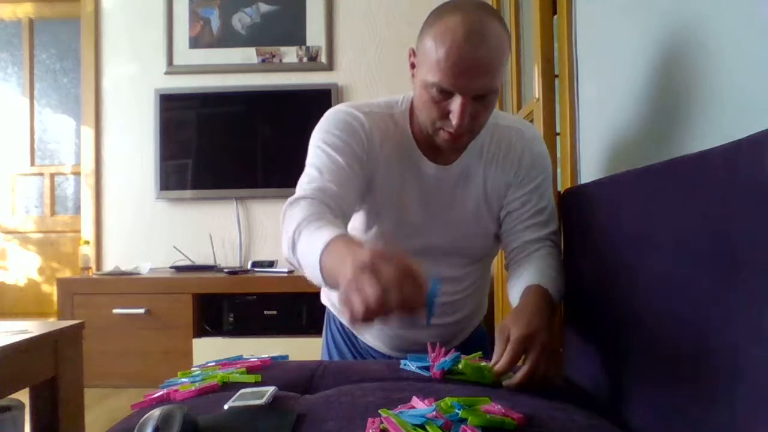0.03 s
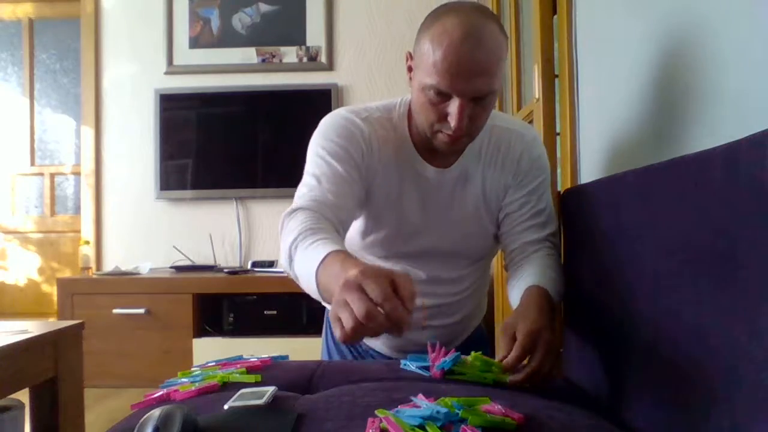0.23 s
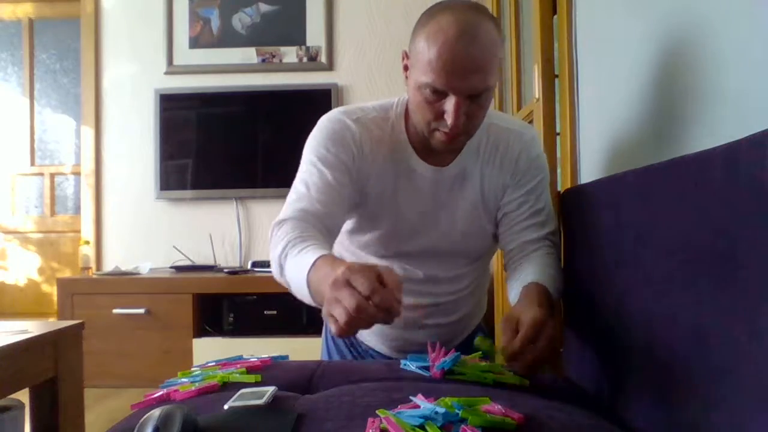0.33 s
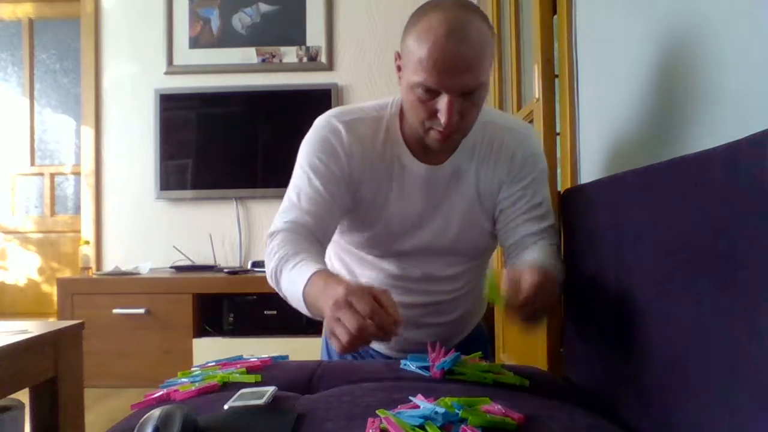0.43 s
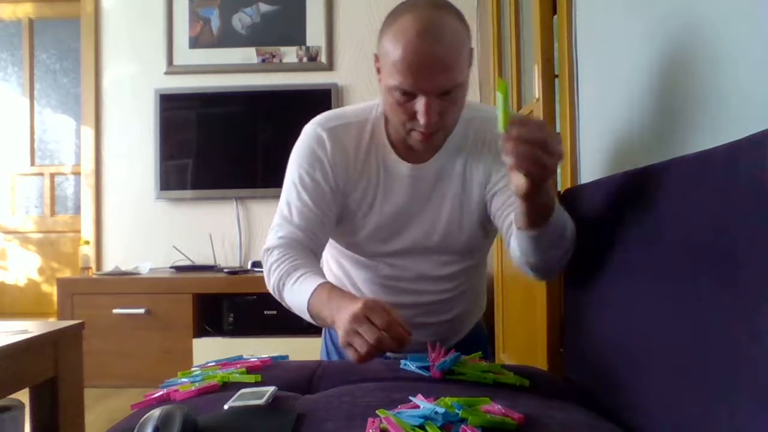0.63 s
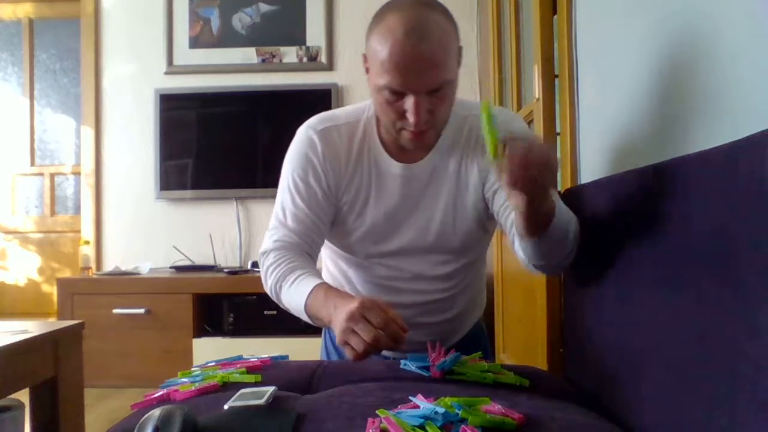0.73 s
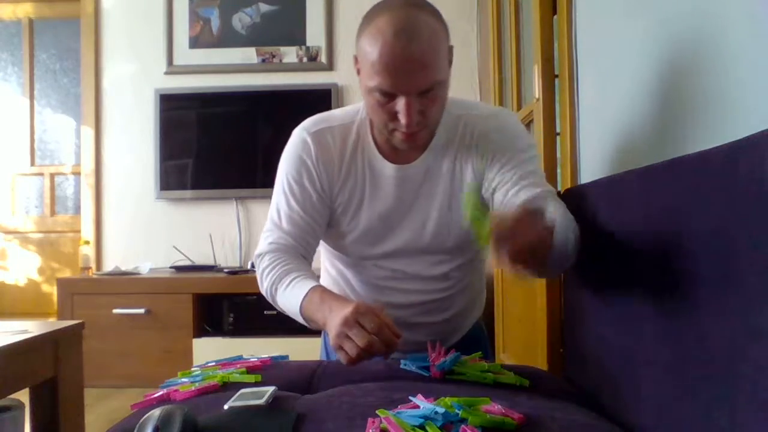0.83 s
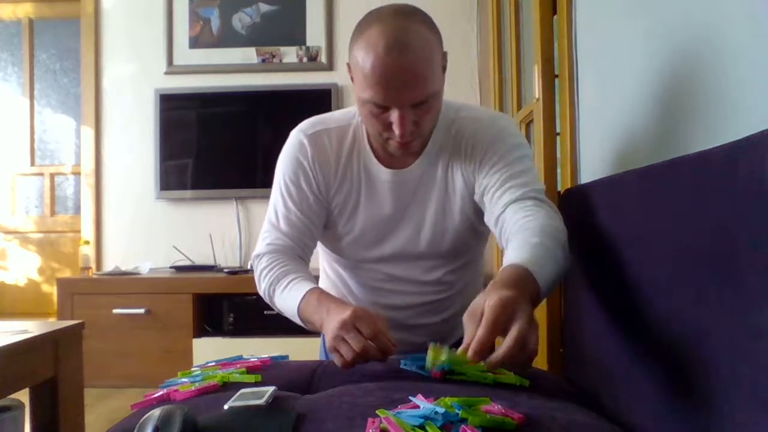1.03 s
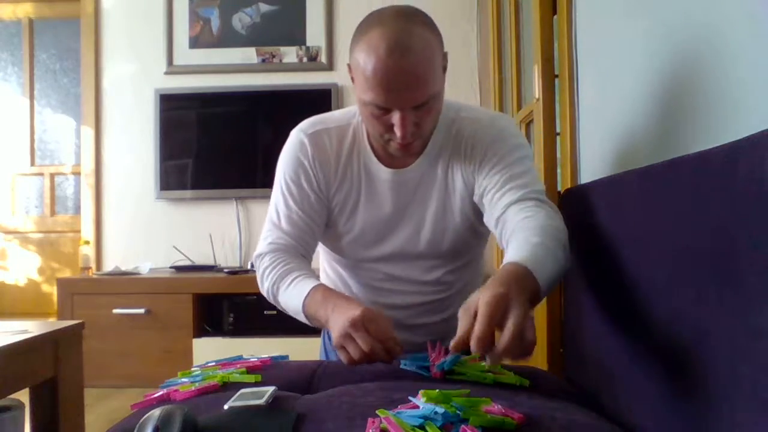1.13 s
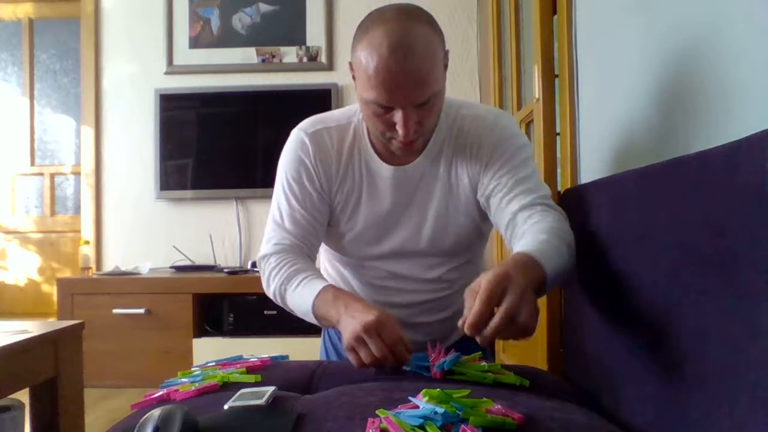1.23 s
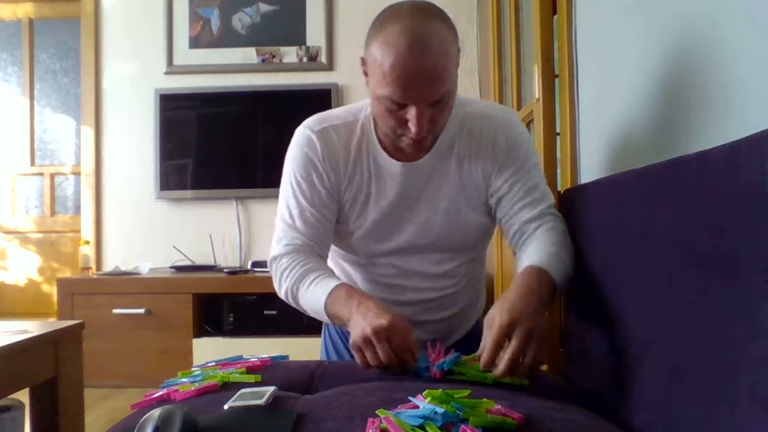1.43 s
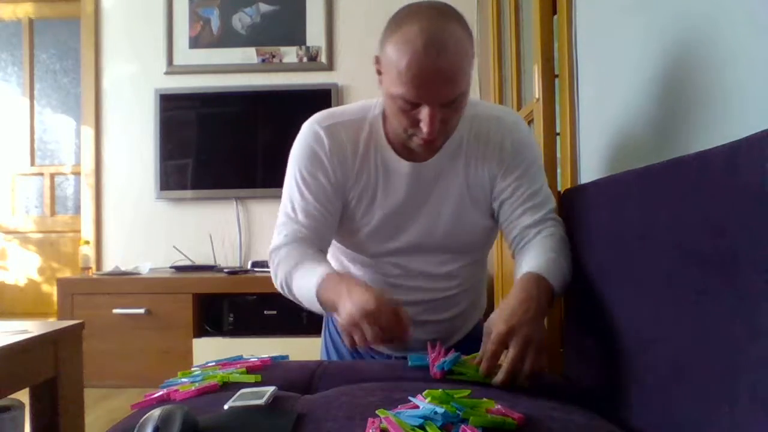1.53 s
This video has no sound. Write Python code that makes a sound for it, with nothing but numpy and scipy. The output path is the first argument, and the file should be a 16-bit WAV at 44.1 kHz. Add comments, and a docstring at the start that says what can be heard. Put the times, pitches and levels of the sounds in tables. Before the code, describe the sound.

Plastic clothespins clip together on a sofa cushion in a small living room. A faint creak at 0.18 s leads to a sharp, rattling snap at 0.25 s with dull thuds. A light tick comes near 0.67 s, then soft rustles and a fainter tick at 0.93 s. A thin squeak at 1.06 s precedes a softer snap around 1.18 s; cloth rustles near 1.55 s. Low pulsing electrical buzz and faint hiss continue throughout.

```python
"""Clothespins on a sofa cushion

Plastic clothespins clip together in a small living room. One creaks and another squeaks as it is squeezed;
each then snaps in a cluster of clicks (noise crack, jaw ring, body modes) over cushion thuds (damped sines).
Faint ticks come between the snaps; rustles come between and after (both resonant noise). A low electrical
buzz (regular pulses, each with a damped swing) runs throughout, over faint hiss and rumble (coloured noise)."""
import sys
import numpy as np
from scipy import signal
from scipy.fft import rfft, irfft, next_fast_len
from scipy.io import wavfile
from scipy.ndimage import map_coordinates

SR = 44100
rng = np.random.default_rng(int(sys.argv[2]) if len(sys.argv) > 2 else 0)


def log_audio(samples):
    """Write samples as a 16-bit WAV file to the path given in sys.argv[1]."""
    # one column per channel
    frames = np.atleast_2d(samples).T
    # limit to full scale, then quantise
    limited = np.clip(frames, -1, 1)
    pcm = np.round(limited * 32767).astype(np.int16)
    wavfile.write(sys.argv[1], SR, pcm)


N = 70560
TIME = np.arange(N) / SR
AGE = TIME[:SR // 2]  # s since an onset


def amp(db):
    """Amplitude gain from dB."""
    return 10 ** (np.asarray(db) / 20)


def unit(x):
    """Scale to rms 1."""
    return x / np.sqrt(np.mean(x ** 2) + 1e-20)


def along(points, hz):
    """Interpolate (f/Hz, value) points on a log-frequency axis."""
    f, v = np.transpose(points)
    return np.interp(np.log(hz + 1), np.log(f + 1), v)


def filtered(x, response):
    """Multiply the spectrum of x by a response of frequency; zero padding limits wrap-around."""
    m = next_fast_len(len(x) + 8192)
    hz = np.fft.rfftfreq(m, 1 / SR)
    return irfft(rfft(x, m) * response(hz), m)[:len(x)]


def low_cut(x, hz):
    """First-order high-pass."""
    return filtered(x, lambda f: 1j * f / (hz + 1j * f))


def high_cut(x, hz, order):
    """Zero-phase low-pass with Butterworth magnitude."""
    return filtered(x, lambda f: 1 / np.sqrt(1 + (f / hz) ** (2 * order)))


def noise(spectrum):
    """Noise coloured by (f/Hz, level/dB) points, rms 1."""
    return unit(filtered(rng.standard_normal(N), lambda f: amp(along(spectrum, f))))


def band(hz, width_hz):
    """Noise through one resonance, rms 1."""
    return unit(filtered(rng.standard_normal(N), lambda f: 1 / (1 + (2 * (f - hz) / width_hz) ** 2)))


def fade(t60_s, t=AGE):
    """Exponential decay, -60 dB at t60."""
    return np.exp(-np.log(1000) * t / t60_s)


def ring(hz, t60_s):
    """Damped sine mode."""
    return np.sin(2 * np.pi * hz * AGE) * fade(t60_s)


def strike(modes):
    """Sum of an object's modes; level, sign and pitch vary at each blow."""
    out = np.zeros(len(AGE))
    for hz, db, t60_s in modes:
        gain = amp(db + rng.normal(0, 0.97)) * rng.choice([-1, 1])
        out += gain * ring(hz * (1 + rng.normal(0, 0.0034)), t60_s)
    return out


def add(track, s, sound):
    """Mix a sound into a track at time s."""
    part = track[max(round(s * SR), 0):][:len(sound)]
    part += sound[:len(part)]


# room decay: f/Hz, t60/s
ROOM_DECAY = [(100, 0.16), (300, 0.54), (1000, 0.4), (2500, 0.34), (5000, 0.37), (7500, .37)]
# diffuse tail spectrum: f/Hz, level/dB
TAIL_COLOUR = [(100, 5), (300, -10), (700, -2.5), (1300, 5), (2200, 3), (3500, 3.5), (5500, 0),
               (7300, -2.5)]
TAIL_BUILD_S, EARLY_DB, EARLY_T60_S, EARLY_GAP_S = 0.022, -6.5, 0.12, 0.002


def in_room(x, wet_db):
    """Direct sound, early echoes off near furniture, diffuse tail with frequency-dependent decay."""
    hz, t, z = signal.stft(rng.standard_normal(len(AGE)), SR, nperseg=256)
    z = z * fade(along(ROOM_DECAY, hz)[:, None], t)
    z = z * amp(along(TAIL_COLOUR, hz))[:, None]
    tail = signal.istft(z, SR, nperseg=256)[1][:len(AGE)]
    tail = tail * (1 - np.exp(-AGE / TAIL_BUILD_S))
    sparse = rng.standard_normal(len(AGE)) ** 5  # few samples dominate
    early = sparse * fade(EARLY_T60_S) * (AGE > EARLY_GAP_S)
    answer = amp(wet_db) * tail / np.linalg.norm(tail) + amp(EARLY_DB) * early / np.linalg.norm(early)
    return x + signal.fftconvolve(x, answer)[:len(x)]


# jaw contacts, per pin: t/s, level/dB, jaw ring f/Hz, jaw ring level/dB, body level/dB
JAW_CONTACTS = {"blue": [(.2348, -17, 7074, 3.5, -3), (.2452, -19.5, 6230, 6.5, 0.5),
                (.2474, -26, 5060, -10, -12), (.2525, -21, 6800, -5, -21), (.2564, -16.5, 6940, 6.5, -3),
                (.258, -23, 5500, 6.5, -5)], "green": [(1.1631, -21, 5730, 6.5, -3.5),
                (1.1742, -31, 5090, 3.5, -0.5), (1.1784, -18, 6660, 4.5, -5.5),
                (1.1853, -24, 6120, -2.5, 0), (1.1905, -27.5, 4760, -1, 2)]}
# pin body modes, per pin: f/Hz, level/dB, t60/s
PIN_MODES = {"blue": [(945, -22.5, 0.012), (1137, -17, 0.016), (1630, -20, .012), (2446, -15, .018),
             (2792, -16, 0.018), (3383, -12.5, 0.023), (3765, -12, 0.02), (4446, -7, 0.011),
             (5820, -9.5, 0.017), (6800, -21.5, 0.022), (6930, -7.5, 0.022)], "green": [(1150, -21, .025),
             (1304, -19, .025), (1798, -18, 0.014), (2284, -16.5, 0.019), (3353, -16, 0.017),
             (3563, -14, 0.013), (4290, -9, 0.0082), (5180, -12.5, 0.0075), (5700, -9, 0.0069),
             (6640, -9, .02), (7200, -1.5, 0.012)]}
# crack noise spectrum: f/Hz, level/dB
CRACK_SPECTRUM = [(300, -27), (750, -32.5), (1200, -21), (2000, -18), (3000, -7.5), (5000, 1.5),
                  (7200, -4.5), (9000, -10.5)]
# room tail level of each pin's snap, per pin: relative level/dB
PIN_TAIL_DB = {"blue": -0.5, "green": 0}
JAW_T60_S, ATTACK_S, CRACK_T60_S, CRACK_DB = 0.0078, 0.00058, 0.0099, 0.5
SNAP_WET_DB = -6.5
ECHO_S, ECHO_DB = 0.0032, -14.5  # nearest hard surface


def snaps():
    """Each contact excites a noise crack, a bright jaw ring and the modes of the pin's body."""
    out = np.zeros(N)
    onset = 1 - np.exp(-(AGE / ATTACK_S) ** 2)
    crack_shape = onset * fade(CRACK_T60_S)
    crack_rms = np.sqrt(np.mean(crack_shape ** 2))
    for pin, contacts in JAW_CONTACTS.items():
        for s, db, jaw_hz, jaw_db, body_db in contacts:
            crack = unit(noise(CRACK_SPECTRUM)[:len(AGE)] * crack_shape) * crack_rms
            jaw = amp(jaw_db) * ring(jaw_hz, JAW_T60_S)
            body = amp(body_db) * strike(PIN_MODES[pin])
            click = amp(db) * (amp(CRACK_DB) * crack + onset * (jaw + body))
            add(out, s, in_room(click, SNAP_WET_DB + PIN_TAIL_DB[pin]))
            add(out, s + ECHO_S, amp(ECHO_DB) * click)
    return out


# hands pressing pins into the cushion: t/s, level/dB, f/Hz, t60/s
CUSHION_PUSHES = [(0.2342, -43.5, 91.8, 0.083), (0.2466, -27, 350, 0.023), (0.2535, -35, 86, .13),
                  (0.257, -30.5, 375, .022), (.268, -31, 220, 0.01), (0.302, -42, 190, 0.018),
                  (1.168, -43, 325, 0.029), (1.181, -33, 324, 0.016), (1.1949, -37, 266.3, .035),
                  (1.2035, -44, 140, .06)]
THUD_LOW_CUT_HZ, THUD_HIGH_CUT_HZ = 30, 525  # the cushion passes little above


def thuds():
    """Soft cushion pushes: damped low sines, band-limited by the padding."""
    out = np.zeros(N)
    for s, db, hz, t60_s in CUSHION_PUSHES:
        add(out, s, -amp(db) * ring(hz, t60_s))
    soft = high_cut(out, THUD_HIGH_CUT_HZ, order=5)
    return in_room(low_cut(soft, THUD_LOW_CUT_HZ), wet_db=-5.5)


# spring creak envelope: t/s, level/dB
CREAK_ENVELOPE = [(0.146, -79), (.16, -59), (.18, -53.5), (0.193, -61.5), (.203, -84.5)]
# creak resonances: f/Hz, width/Hz, level/dB
CREAK_RESONANCES = [(1869, 110, -11), (2667, 170, -1), (3750, 130, -4.5), (3858, 590, -6.5),
                    (4937, 220, -7.5), (6280, 200, -11.5), (6440, 220, -9)]
CREAK_SAG_PER_S = 0.6  # fractional pitch fall


def creak():
    """Friction noise in the hinge's resonances; a time warp makes them sag in pitch."""
    s, db = np.transpose(CREAK_ENVELOPE)
    rubbed = unit(sum(amp(level) * band(hz, width) for hz, width, level in CREAK_RESONANCES))
    sagging_s = TIME - CREAK_SAG_PER_S * (TIME - s.mean()) ** 2 / 2
    envelope = amp(np.interp(TIME, s, db, left=-np.inf, right=-np.inf))
    return in_room(map_coordinates(rubbed, [sagging_s * SR]) * envelope, wet_db=-9)


# plastic-on-plastic squeak track: t/s, f/Hz, level/dB
SQUEAK_TRACK = [(1.046, 5480, -88.5), (1.063, 5574, -64.5), (1.091, 5760, -76), (1.12, 5900, -86),
                (1.146, 5800, -94.5)]


def squeak():
    """Plastic friction: a thin, mostly rising sine with 20 Hz rms pitch jitter."""
    s, hz, db = np.transpose(SQUEAK_TRACK)
    pitch_hz = np.interp(TIME, s, hz) + 20 * band(69, 400)
    envelope = amp(np.interp(TIME, s, db, left=-np.inf, right=-np.inf))
    return in_room(np.sin(2 * np.pi * np.cumsum(pitch_hz) / SR) * envelope, wet_db=-9)


# light touches of pin on pin: t/s, level/dB
PIN_TOUCHES = [(0.6736, -55.5), (0.932, -69.5)]
# touch resonances: f/Hz, width/Hz, level/dB, t60/s
TOUCH_RESONANCES = [(4310, 255, -4, 0.043), (4410, 700, -7.5, 0.12), (5936, 230, -18.5, 0.26)]


def ticks():
    """Grazing pins: scrape noise in a few decaying resonances."""
    out = np.zeros(N)
    for s, db in PIN_TOUCHES:
        scrape = np.zeros(N)
        for hz, width_hz, mode_db, t60_s in TOUCH_RESONANCES:
            scrape += amp(mode_db) * band(hz, width_hz) * fade(t60_s, TIME)
        add(out, s, amp(db) * scrape)
    return in_room(out, wet_db=-14)


# sleeves and fingers brushing: t/s (peak), length/s (peak to 1/e), level/dB, f/Hz (centre), width/Hz
BRUSHES = [(0.722, 0.046, -78.5, 1380, 700), (0.816, 0.051, -74.5, 1130, 450),
           (1.54, 0.14, -71.5, 868, 130), (1.57, .035, -73, 2450, 2600)]


def rustles():
    """Cloth and skin friction: band noise in Gaussian swells."""
    out = np.zeros(N)
    for s, length_s, db, hz, width_hz in BRUSHES:
        swell = np.exp(-((TIME - s) / length_s) ** 2)
        out += amp(db) * band(hz, width_hz) * swell
    return out


BUZZ_HZ, BUZZ_START_S, BUZZ_DB, BUZZ_SCATTER_DB = 30.01, 0.002, -45.5, 0.84
SWING_HZ, SWING_T60_S = 71.7, 0.088
EDGE_DB, EDGE_S = -6, 0.0023
BUZZ_LOW_CUT_HZ, BUZZ_HIGH_CUT_HZ = 10, 212


def buzz():
    """Regular electrical pulses: brief rise, sharp drop, low damped swing."""
    pulses = np.zeros(N)
    for s in np.arange(BUZZ_START_S, N / SR, 1 / BUZZ_HZ):
        add(pulses, s, amp(BUZZ_DB + BUZZ_SCATTER_DB * rng.standard_normal(1)))
    rise = amp(EDGE_DB) * np.exp(-AGE[::-1] / EDGE_S)
    swing = -np.cos(2 * np.pi * SWING_HZ * AGE) * fade(SWING_T60_S)
    # "same" centres the drop on each pulse
    wave = signal.fftconvolve(pulses, np.concatenate([rise, swing]), "same")
    return low_cut(high_cut(wave, BUZZ_HIGH_CUT_HZ, order=2), BUZZ_LOW_CUT_HZ)


# hiss spectrum: f/Hz, level/dB
HISS_SPECTRUM = [(300, 12), (700, -4), (880, 3), (1050, -4), (2000, -6.5), (2800, -12.5), (3180, -8.5),
                 (3600, -15.5), (5500, -14.5), (7400, -13)]
# rumble spectrum: f/Hz, level/dB
RUMBLE_SPECTRUM = [(20, -10), (60, -1.5), (120, 13.5), (270, -22.5), (450, -0.5), (800, -35.5)]
HISS_DB, RUMBLE_DB = -66, -74.5


def room_tone():
    """Steady hiss and rumble: two coloured noises."""
    return amp(HISS_DB) * noise(HISS_SPECTRUM) + amp(RUMBLE_DB) * noise(RUMBLE_SPECTRUM)


def scene():
    """Sum of all sources, one channel."""
    pins = snaps() + thuds() + creak() + squeak() + ticks()
    return (pins + rustles() + buzz() + room_tone())[None]


CUTOFF_HZ, STOP_HZ = 7410, 8450


def record(dry):
    """Recorder bandwidth: steep low-pass, nothing from STOP_HZ up."""
    return filtered(dry[0], lambda f: (f < STOP_HZ) / np.sqrt(1 + (f / CUTOFF_HZ) ** 130))[None]


dry = scene()
out = record(dry)
log_audio(out)
```